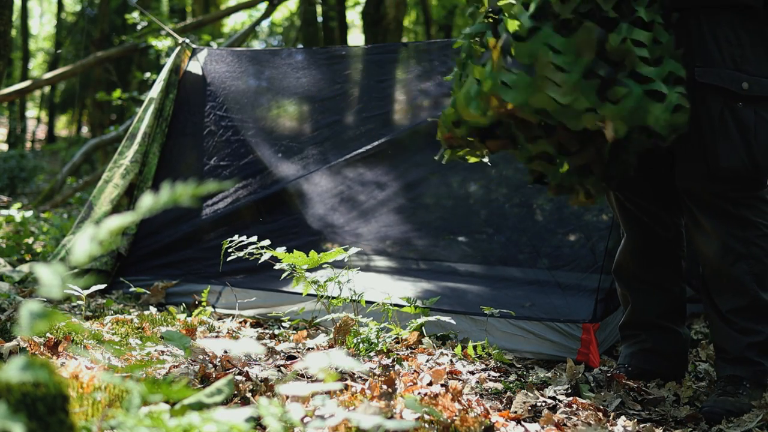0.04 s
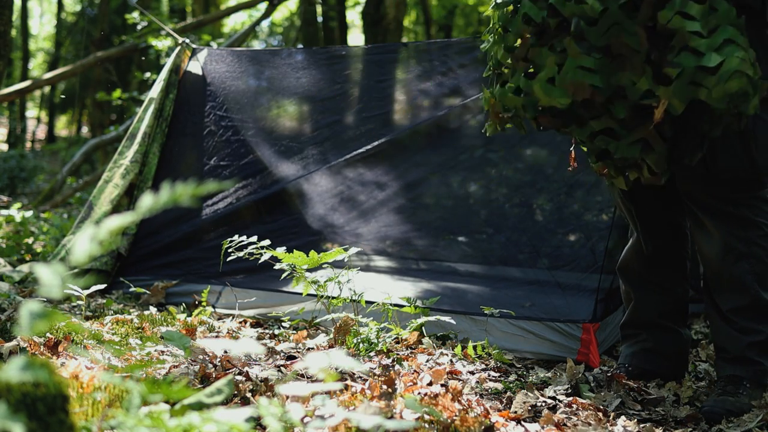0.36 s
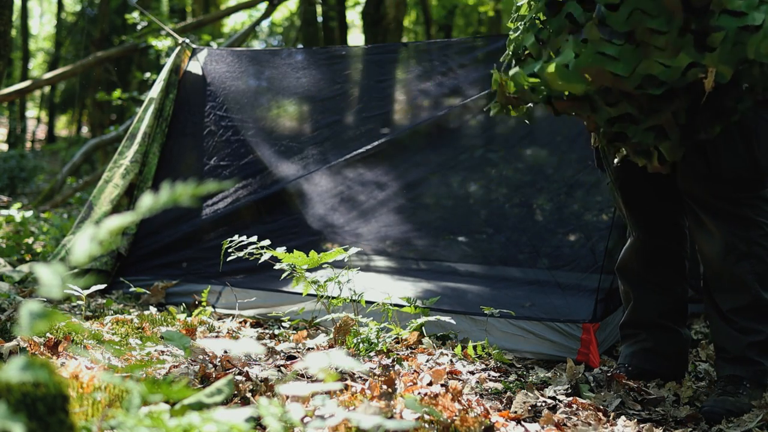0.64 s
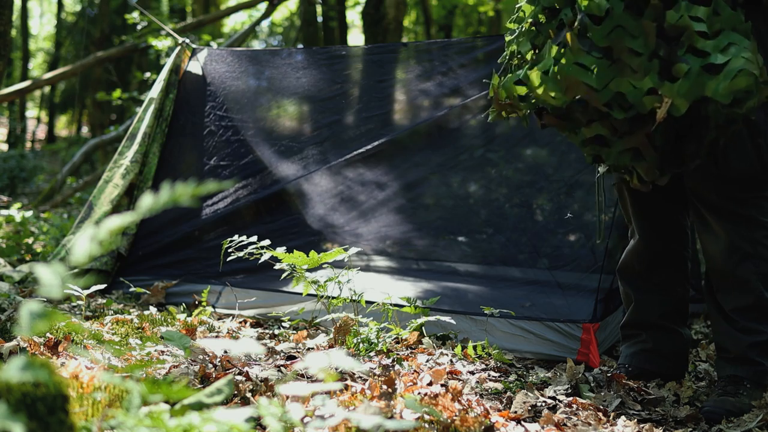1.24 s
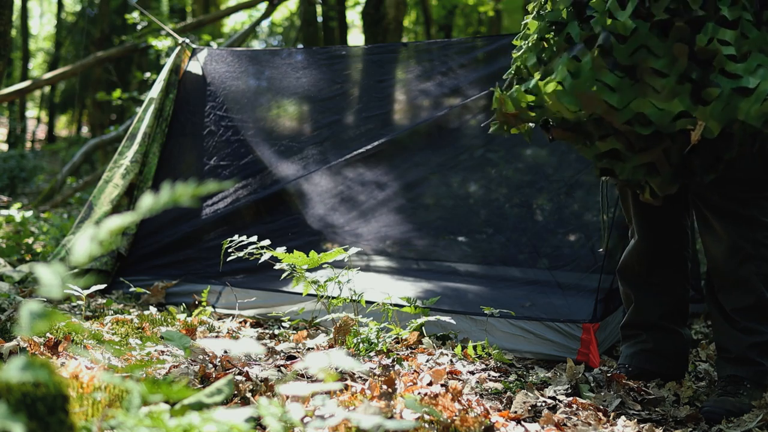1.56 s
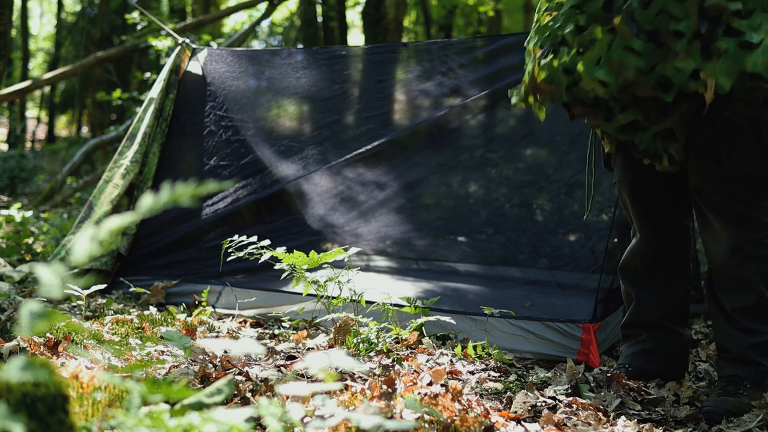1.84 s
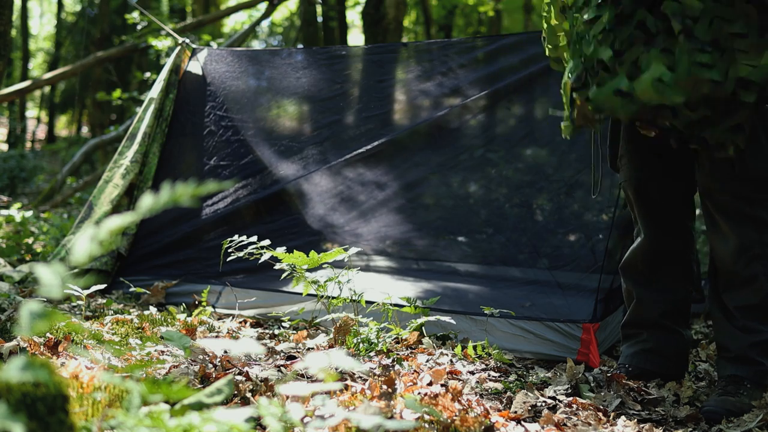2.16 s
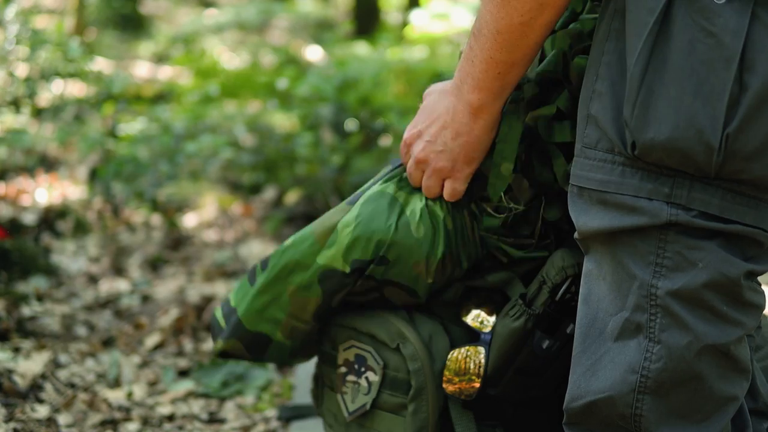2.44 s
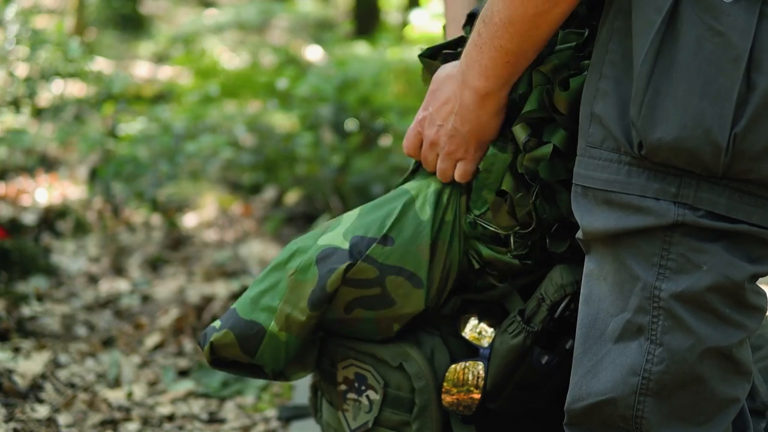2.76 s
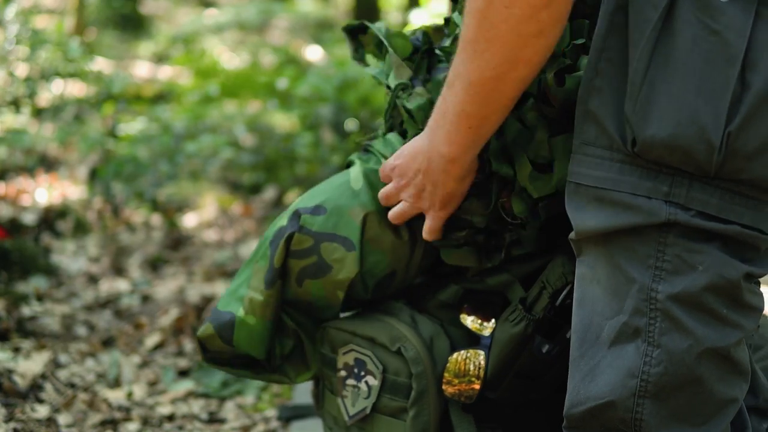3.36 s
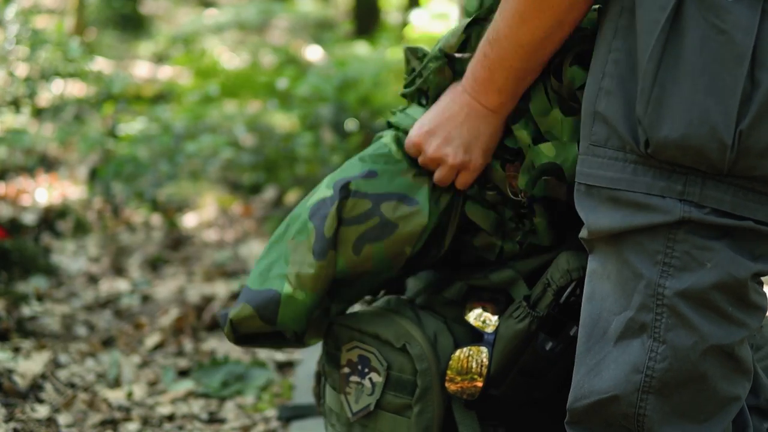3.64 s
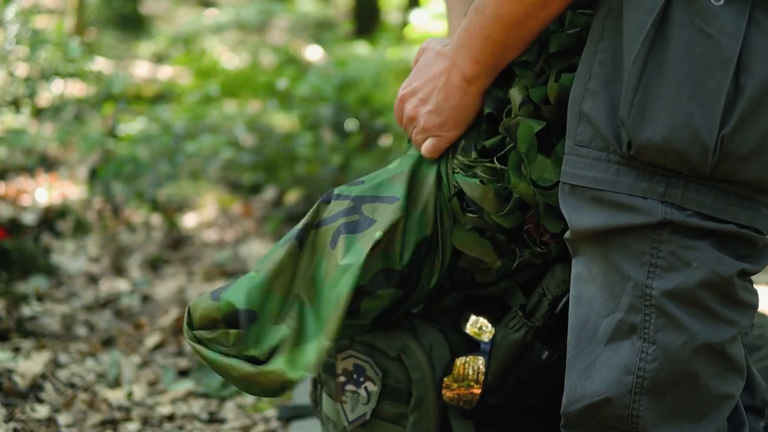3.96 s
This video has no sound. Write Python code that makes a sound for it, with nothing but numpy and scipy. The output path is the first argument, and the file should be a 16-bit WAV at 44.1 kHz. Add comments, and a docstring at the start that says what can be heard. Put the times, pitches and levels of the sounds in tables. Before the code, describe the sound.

A camouflage net rustles, then is stuffed into a fabric sack in a quiet forest.

```python
"""In a quiet forest, a camouflage net is gathered up and then stuffed into a fabric sack close by.
Cloth sliding on cloth catches and slips thousands of times a second, which makes a rustle, and tiny
creases crinkle as they flip. Folds snap over, and the hand and the bundle knock softly in the sack.
A distant bird whistles a few notes at the start, over the faint hush of the forest air."""
import sys
import numpy as np
from scipy import signal
from scipy.fft import rfft, irfft, next_fast_len
from scipy.io import wavfile

SR = 44100
rng = np.random.default_rng(int(sys.argv[2]) if len(sys.argv) > 2 else 0)


def pcm_store(signal):
    """Save signal as 16-bit PCM."""
    levels = np.round(np.clip(np.atleast_2d(signal), -1, 1) * 32767)
    wavfile.write(sys.argv[1], SR, levels.astype(np.int16).T)


N = 176400
T = np.arange(N) / SR


def stuffing_sack(body_trim_db=-1.5, hiss_trim_db=0.46, bass_trim_db=-2):
    """The net is pushed along the sack wall, making a close, full, coarse rustle."""
    # Each row: time in seconds, then body, hiss and bass levels in dB, before the trims are added.
    loudness = [(2.264, -46, -51.5, -56), (2.408, -41.5, -46.0, -64), (2.48, -33.5, -37.5, -48),
                (2.54, -34.0, -32.5, -51), (2.648, -37.0, -37.5, -51), (2.744, -33, -37.0, -49.5),
                (2.768, -33, -34.0, -46), (2.804, -35, -39, -46.5), (2.888, -36, -39.5, -55),
                (2.948, -48, -55.5, -61.0), (3.008, -40.5, -44.0, -63), (3.08, -34, -37, -42.5),
                (3.104, -40.0, -41.5, -47), (3.164, -39.5, -44.5, -57.5), (3.248, -43.5, -50.5, -56.5),
                (3.296, -44.5, -44, -65), (3.308, -46.5, -48.5, -56), (3.404, -47, -48.5, -60.5),
                (3.44, -42, -46, -57), (3.488, -42.5, -44.5, -60), (3.536, -38.5, -43.5, -53),
                (3.692, -35, -37.5, -56.5), (3.74, -36, -40.5, -49.5), (3.764, -35, -37.5, -53.5),
                (3.848, -38, -42.5, -53), (3.908, -37.5, -41.0, -52), (3.956, -33.5, -36.5, -48),
                (4.0, -37, -38.0, -53)]
    # The tone of the sack. Each row: frequency in Hz, gain in dB.
    tone = [(30, -40), (55, -19), (103, -15.5), (187, -8), (270, -7), (365, -3), (470, -7), (600, -2.5),
            (780, -0.5), (1100, -2), (1700, -2.5), (2900, -3), (4700, -5), (6850, -7.5), (8600, -5),
            (9600, -7.5), (10300, -14), (11300, -14), (13600, -10.5), (15500, -17)]
    body_db, hiss_db, bass_db = curves(loudness)
    rub = slips(per_s=4000, friction_db=2.5, flutter_hz=45)
    rub += from_db(-10.5) * crinkles(per_s=700, spread_db=3)
    below_hiss, hiss = split(colour(rub, tone), hz=4320, order=2)
    bass, body = split(below_hiss, hz=362, order=3)
    return (at_level(body, body_db + body_trim_db)
            + at_level(hiss, hiss_db + hiss_trim_db)
            + at_level(bass, bass_db + bass_trim_db))


def gathering_net(body_trim_db=-0.32, hiss_trim_db=0.9):
    """The leaves of the net slide over each other, making a light rustle."""
    # Each row: time in seconds, then body and hiss levels in dB, before the trims are added.
    loudness = [(0.0, -53, -48), (0.06, -52, -46.0), (0.144, -48, -49.5), (0.24, -53.5, -52),
                (0.276, -50.5, -49.5), (0.3, -51.5, -52.5), (0.348, -51, -49.0), (0.444, -49.0, -52.5),
                (0.624, -47.5, -47.5), (0.684, -43.5, -42.0), (0.804, -46.5, -48), (0.84, -52.5, -51.5),
                (0.936, -54.5, -57.0), (0.984, -46.0, -49), (1.032, -42.5, -46.5), (1.116, -46.5, -48),
                (1.152, -44.5, -44.5), (1.188, -47, -52.5), (1.296, -43.0, -46.5), (1.392, -44.5, -50),
                (1.476, -44, -50), (1.608, -45.5, -49.5), (1.692, -51.5, -55.5), (1.776, -48.5, -54.5),
                (1.8, -43.0, -40.5), (1.848, -38, -39), (1.932, -43.0, -43.5), (1.98, -43.5, -41),
                (2.076, -48.5, -49.5), (2.124, -47.5, -45), (2.208, -46, -44.5), (2.252, -47, -45.5)]
    # The tone of the net. Each row: frequency in Hz, gain in dB.
    tone = [(90, -32), (150, -20), (200, -17.5), (310, -10.5), (450, -3.5), (560, -1), (720, -3),
            (1100, -1), (1850, 0), (3000, -1), (4650, -3), (6700, -6), (8500, -2.5), (9600, -7.5),
            (10200, -14), (11200, -12.5), (12800, -8), (14100, -10.5), (15500, -15.5)]
    body_db, hiss_db = curves(loudness)
    rub = slips(per_s=5000, friction_db=2, flutter_hz=39)
    rub += from_db(-11.5) * crinkles(per_s=700, spread_db=4)
    body, hiss = split(colour(rub, tone), hz=4320, order=2)
    return at_level(body, body_db + body_trim_db) + at_level(hiss, hiss_db + hiss_trim_db)


def slips(per_s, friction_db, flutter_hz, flutter_db=0.58):
    """Cloth catches and lets go: tiny clicks over smooth rubbing, with a slight flutter in level."""
    clicks = at_level(random_clicks(per_s, spread_db=3, max_spreads=3.6))
    friction = from_db(friction_db) * rng.standard_normal(N)
    flutter = from_db(flutter_db * drift(flutter_hz))
    return at_level((clicks + friction) * flutter)


def crinkles(per_s, spread_db, pitch_count=14):
    """Tiny creases flip at random moments, each ringing for a few cycles at one of several pitches."""
    clicks = random_clicks(per_s, spread_db, max_spreads=3)
    pitch_choice = rng.integers(0, pitch_count, N)
    out = np.zeros(N)
    for k, hz in enumerate(np.linspace(1220, 14100, pitch_count)):
        b, a = signal.iirpeak(hz, Q=3, fs=SR)
        out += signal.lfilter(b, a, clicks * (pitch_choice == k) + 1e-18) / np.sqrt(hz)
    return at_level(out)


def fold_snaps():
    """Folds of cloth flip over with a sharp, bright snap."""
    # Each row: start in seconds, peak level in dB, centre frequency in Hz.
    snaps = [(0.1240, -25.5, 6500), (1.786, -24, 6000), (1.870, -22, 5500), (2.337, -27, 2370),
             (2.4055, -32, 2600), (2.509, -33, 2000), (2.6943, -14, 2100), (2.879, -12.8, 2850),
             (3.0598, -17.5, 3300), (3.1642, -24.5, 2200), (3.5278, -25.5, 2380), (3.614, -28, 2500),
             (3.7405, -18, 3400), (3.8013, -29, 1600)]
    return pops(snaps, q=1.05, shiver_db=-23, fade_s=0.003)


def soft_knocks():
    """The bundle and the hand bump the cloth with dull knocks."""
    # Each row: start in seconds, peak level in dB, centre frequency in Hz.
    knocks = [(0.688, -35, 484), (2.272, -44, 170), (2.286, -33, 950), (2.392, -40, 230), (2.558, -23, 656),
              (2.6945, -28.5, 605), (2.719, -21, 750), (2.735, -25, 900), (2.756, -33, 950),
              (2.8805, -23.5, 800), (3.071, -21.5, 895), (3.0805, -22, 620), (3.1137, -26, 680),
              (3.594, -36, 900), (3.952, -36, 750)]
    return pops(knocks, q=1.2, shiver_db=-18, fade_s=0.0048)


def pops(rows, q, shiver_db, fade_s):
    """Each pop is one jerk of the cloth and a short shiver; a low q means it hardly rings."""
    out, t = np.zeros(N + SR), T[:SR // 8]
    impulse = (t == 0) + 1e-18
    for start_s, db, hz in rows:
        angle = 2 * np.pi * hz / SR
        damping = np.sin(angle) / (2 * q)
        b, a = [1, 0, -1], [1 + damping, -2 * np.cos(angle), 1 - damping]  # passes a band around hz
        jerk = signal.lfilter(b, a, signal.lfilter(b, a, impulse))
        noise = signal.lfilter(b, a, rng.standard_normal(len(t)))
        shiver = at_level(noise, shiver_db) * np.exp(-t / fade_s)
        i = int(start_s * SR)
        out[i:i + len(t)] += from_db(db) * (jerk / np.abs(jerk).max() + shiver)
    return out[:N]


def distant_bird(waver_hz=14, edge_s=0.01, echo_s=0.84, echo_db=-5):
    """Thin whistles waver a little around a nearly steady pitch and linger among the trees."""
    # Each row: start in seconds, length in seconds, pitch in Hz, pitch glide in Hz, level in dB.
    notes = [(0.0, 0.074, 2270, -20, -53), (0.055, 0.11, 2152, 2, -54.5), (0.272, .04, 2605, 24, -52),
             (0.297, .055, 2730, -20, -58.5)]
    song, waver = np.zeros(N), waver_hz * drift(60)
    for start_s, length_s, hz, glide_hz, db in notes:
        age = T - start_s
        pitch = hz + glide_hz * np.clip(age / length_s, 0, 1) + waver
        fade = np.clip(np.minimum(age, length_s - age) / edge_s, 0, 1)
        song += from_db(db) * fade * np.sqrt(2) * np.sin(2 * np.pi * np.cumsum(pitch) / SR)
    trees = rng.standard_normal(SR) * from_db(-60 * T[:SR] / echo_s)
    echo = signal.fftconvolve(song, trees / np.linalg.norm(trees))[:N]
    return song + from_db(echo_db) * echo


def forest_air():
    """The air of the forest is a faint, steady hush."""
    # The tone of the hush. Each row: frequency in Hz, gain in dB.
    tone = [(20, -32), (40, -11), (60, -4), (100, 1), (200, -4.5), (500, -11), (1500, -1), (5000, -21.5),
            (15000, -11.5)]
    return at_level(colour(rng.standard_normal(N), tone), db=-57.5)


def random_clicks(per_s, spread_db, max_spreads):
    """Clicks at random moments: most are small, a few are up to max_spreads * spread_db louder."""
    sizes_db = spread_db * np.minimum(rng.exponential(1, N), max_spreads)
    signs = rng.choice([-1, 1], N)
    return from_db(sizes_db) * signs * (rng.random(N) < per_s / SR)


def drift(hz, step=40, warm_up=2000):
    """A smooth random wobble, about 1 in size; a higher hz makes it quicker."""
    pole = np.exp(-2 * np.pi * hz * step / SR)
    noise = rng.standard_normal(N // step + warm_up + 2)
    slow = signal.lfilter([1], [1, -2 * pole, pole * pole], noise)[warm_up:]
    return np.interp(np.arange(N) / step, np.arange(len(slow)), at_level(slow))


def colour(x, tone):
    """Make each frequency louder or softer, following a tone table."""
    size = next_fast_len(N + SR // 4, True) // 2 * 2
    hz, db = np.transpose(tone)
    grid_hz = np.maximum(np.arange(size // 2 + 1) * SR / size, 1)
    gain = from_db(np.interp(np.log(grid_hz), np.log(hz), db))
    gain *= grid_hz / np.hypot(grid_hz, hz[0] / 2)  # fades out below the first row
    # These steps make the filter ring only after a click, never before it (minimum phase).
    cepstrum = irfft(np.log(gain))
    cepstrum[1:size // 2] *= 2
    cepstrum[size // 2 + 1:] = 0
    return irfft(rfft(x, size) * np.exp(rfft(cepstrum)))[:N]


def split(x, hz, order):
    """The parts of a sound below and above a frequency; they add up to the whole."""
    low = signal.sosfiltfilt(signal.butter(order, hz, fs=SR, output="sos"), x)
    return low, x - low


def curves(rows):
    """Join timed rows with straight lines, giving each column a value at every sample."""
    times, *columns = np.transpose(rows)
    return [np.interp(T, times, column) for column in columns]


def at_level(x, db=0):
    """Scale a sound to an average power of 1, then turn it up or down by db."""
    return from_db(db) * x / np.sqrt(np.mean(x ** 2) + 1e-20)


def from_db(db):
    """Turn decibels into a number to multiply by."""
    return 10 ** (np.asarray(db) / 20)


def scene(sack_from_s=2.255, blend_s=0.012):
    """The net's rustle gives way to the sack's, over the forest; both channels are the same."""
    sack_share = np.clip((T - sack_from_s) / blend_s + 0.5, 0, 1)
    rustle = np.sqrt(1 - sack_share) * gathering_net() + np.sqrt(sack_share) * stuffing_sack()
    mix = rustle + fold_snaps() + soft_knocks() + forest_air() + distant_bird()
    return np.tile(mix, (2, 1))


def record(dry, cutoff_hz=15750):
    """Cut off the very highest treble steeply."""
    return signal.sosfilt(signal.ellip(12, 0.1, 80, cutoff_hz, fs=SR, output="sos"), dry)


dry = scene()
out = record(dry)
pcm_store(out)
```